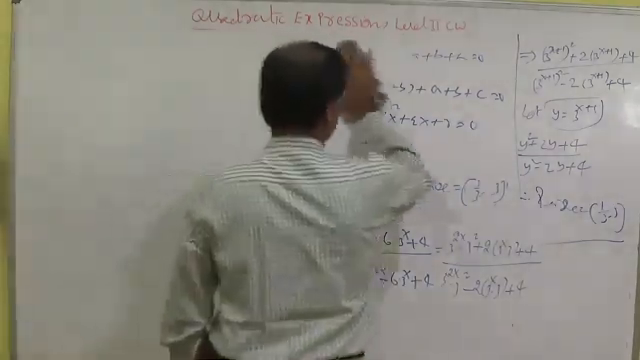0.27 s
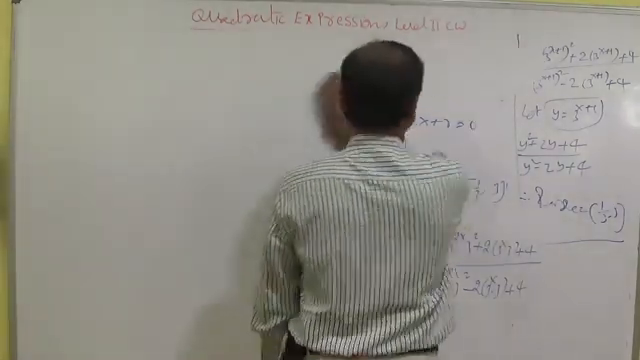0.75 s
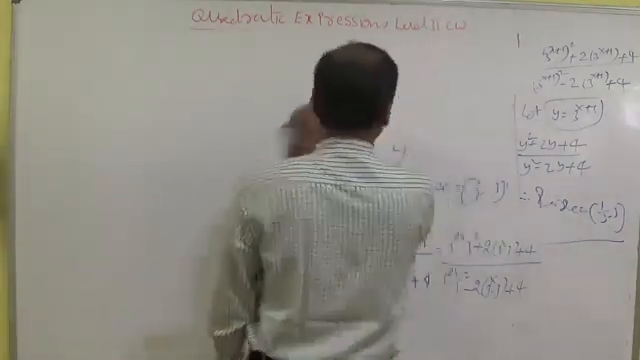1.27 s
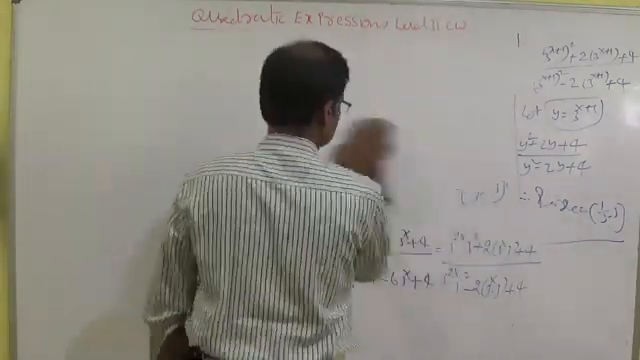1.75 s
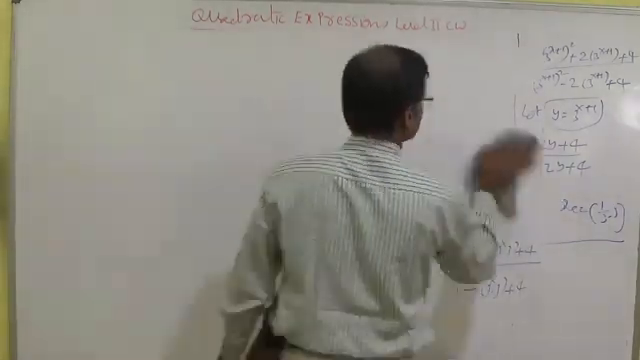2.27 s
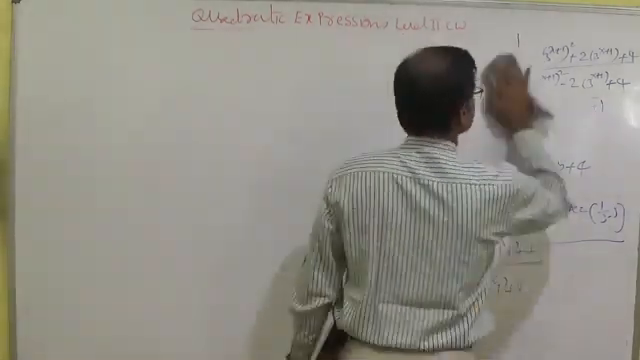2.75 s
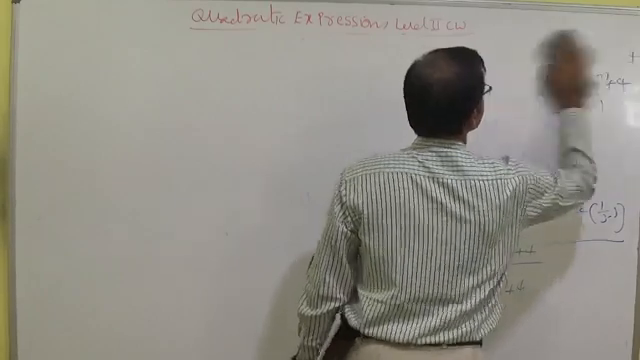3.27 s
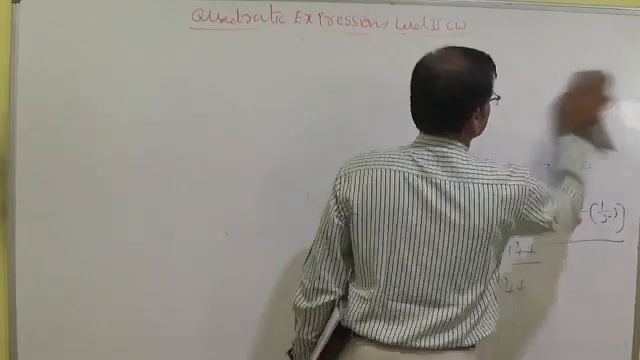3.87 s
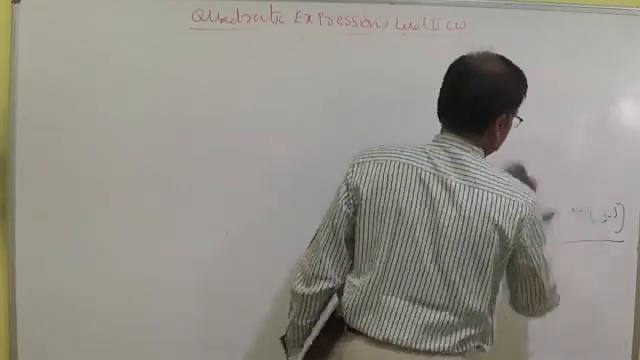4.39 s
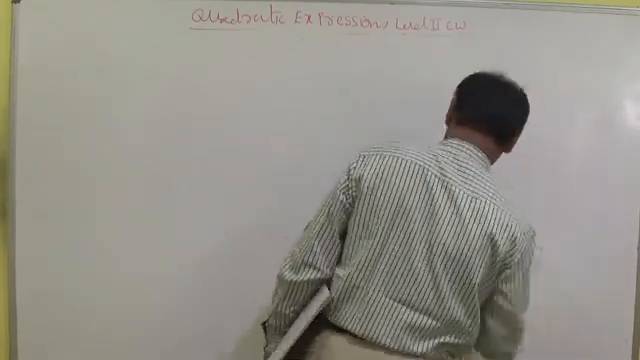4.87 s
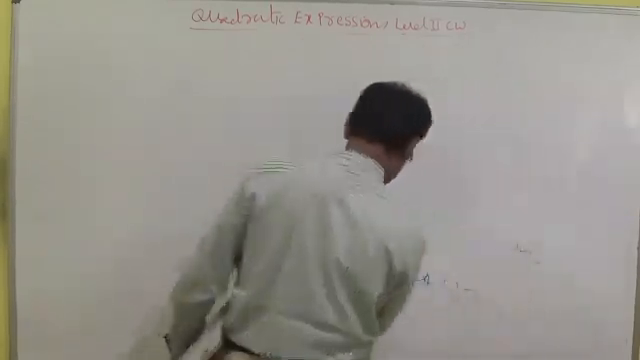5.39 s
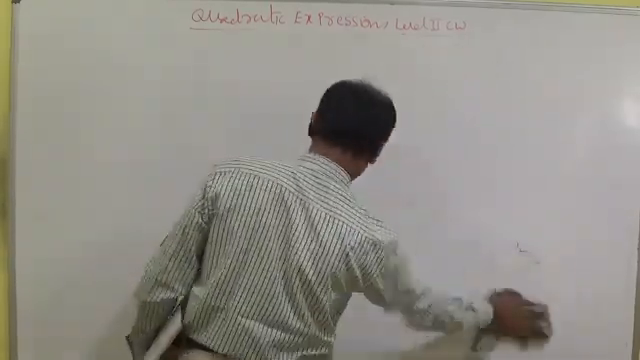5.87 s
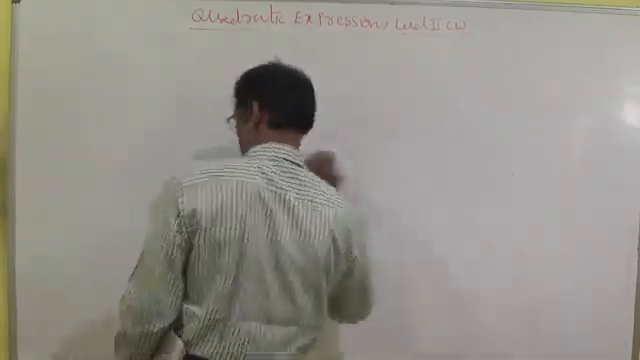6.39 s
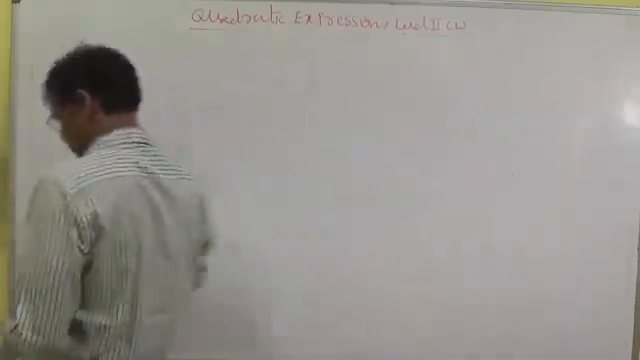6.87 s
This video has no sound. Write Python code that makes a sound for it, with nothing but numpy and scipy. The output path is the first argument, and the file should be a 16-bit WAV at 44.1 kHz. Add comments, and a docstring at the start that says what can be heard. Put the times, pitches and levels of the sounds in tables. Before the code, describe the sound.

A whiteboard is wiped with a felt duster in a bare, echoing classroom, over faint steady noise and light brushing. The duster's hard back clacks sharply right at the start. At about 0.5 seconds comes a loud, bright metallic double clink, with a tiny squeak just before and after. From 1 to 2.8 seconds the felt hisses in quick, uneven strokes. The loose board knocks against the wall with irregular hollow thumps until about 6.3 seconds, strongest near 0.9 and 1.4. Light clacks near 3.1 lead to a second loud double clink at 3.4. Until about 5.2 there are mostly knocks, soft brushing and a few faint chirps. Then the swishing strokes return and run to about 6.8, with brief high squeaks around 6 and 6.5. Another squeak and one short swipe come at about 7 seconds.

```python
"""A felt duster wipes a whiteboard in quick strokes, hissing by sliding friction.
Stick-slip makes it squeak. As the strokes turn, the loose panel knocks against the wall and booms
in its modes. The duster's hard back clacks, and twice something metal, probably the frame, gives
a loud double clink. The bare classroom reverberates over a faint, steady noise."""
import sys
import numpy as np
from scipy import signal
from scipy.fft import rfft, irfft, next_fast_len
from scipy.io import wavfile
from scipy.ndimage import uniform_filter1d, minimum_filter1d, map_coordinates

SR = 44100
rng = np.random.default_rng(int(sys.argv[2]) if len(sys.argv) > 2 else 0)


def to_wav(s):
    """Save 16-bit WAV."""
    ch = np.atleast_2d(s).T  # columns
    pcm = np.round(np.clip(ch, -1, 1) * 32767)  # PCM
    wavfile.write(sys.argv[1], SR, pcm.astype(np.int16))


N = 314857
TIME = np.arange(N) / SR
AGE = np.arange(SR // 5) / SR  # time since a contact
TOP_HZ = 11080  # upper band limit

# reverberation time of the late field: f/Hz, T60/s
REVERB_TIME = [(150, 0.79), (500, 1.0), (1200, 1), (3000, 1), (7000, 0.902), (11000, 0.74)]
# stereo width of the diffuse field: f/Hz, side relative to mid/dB
SIDE_GAIN = [(60, -13), (110, -20), (190, -13), (350, -12.5), (630, -9.5), (1120, -5.5), (2020, -5.5),
             (3630, -7), (6520, -7), (11700, -11.5)]
# steady room noise: f/Hz, level/dB
AIR_SPECTRUM = [(15, -54), (25, -24.5), (59, -14.5), (229, -7.5), (651, 0), (721, -4), (1080, -1.5),
                (1360, -5), (2160, -7), (2510, -1.5), (2850, -8), (5820, -12), (10200, -8), (11000, -13),
                (14300, -42), (22000, -120)]
# light brushing of the felt: f/Hz, level/dB
BRUSH_SPECTRUM = [(60, -23.5), (150, -2), (400, 6), (1500, 1.5), (5000, 0.5), (11000, -7.5)]
# envelope of that brushing: t/s, level/dB
BRUSH_ENVELOPE = [(0, 12.5), (.25, 7.5), (1.7, 5), (2.4, 3.5), (3.2, 2), (4.1, 0), (4.8, -9), (5.1, 1),
                  (7, -1.5)]
# the duster catching and slipping: t/s, level/dB, f/Hz, duration/s, roughness (0-1)
SQUEAK_EVENTS = [(0.321, -45.5, 1797, 0.012, 0.38), (0.739, -42, 4273, 0.0263, 0.45),
                 (3.993, -54.5, 2600, 0.0058, 0.38), (4.396, -58, 2650, 0.006, 0.42),
                 (4.8, -57, 2533, 0.0049, 0.45), (5.859, -40.5, 4426, 0.011, 0.34),
                 (6.059, -46.5, 4690, 0.016, 0.28), (6.466, -45, 1690, 0.0224, 0.44),
                 (7.024, -43, 3708, 0.013, 0.37), (7.029, -39.5, 2569, 0.0077, 0.02)]
# the panel striking the wall: t/s, level/dB, contact corner f/Hz
PANEL_KNOCKS = [(0.052, -45.5, 600), (0.384, -45.5, 850), (0.469, -54, 300), (0.499, -46, 1000),
                (0.757, -55, 160), (0.867, -38, 1010), (1.315, -55, 200), (1.386, -35, 1060),
                (1.929, -41, 840), (2.537, -45, 1000), (2.911, -44.5, 990), (3.067, -44.5, 1010),
                (3.159, -59, 170), (3.353, -43.5, 1100), (3.372, -44.5, 1100), (3.589, -55.5, 140),
                (3.757, -52.5, 806), (4.000, -56, 151), (4.162, -45, 1105), (4.562, -49.5, 1076),
                (4.645, -51.5, 970), (4.808, -58.5, 150), (4.915, -42, 980), (5.347, -49.5, 696),
                (5.465, -46, 403), (5.724, -50, 410), (6.304, -48.5, 702)]
# envelope of the panel's modes: f/Hz, level/dB
PANEL_SPECTRUM = [(120, -17.5), (170, -7.5), (270, -2), (400, -0.5), (650, 0.5), (950, -1), (1300, -8.5),
                  (2000, -9)]
# contact of panel and wall: f/Hz, level/dB
TICK_SPECTRUM = [(100, -44), (300, 12.5), (1200, 4.5), (2500, 5.5), (5000, 3.5), (7000, 2), (10500, 4)]
# impacts of the duster's back: t/s, level/dB, contact corner f/Hz
SHELL_IMPACTS = [(0.0516, -24, 10000), (0.0549, -31, 18000), (0.805, -41, 8000), (3.0681, -41.5, 5650),
                 (3.098, -46, 5840), (6.59, -50.5, 15000)]
# modes of the duster's back: f/Hz, bandwidth/Hz, level/dB
SHELL_MODES = [(1420, 1100, -6), (3210, 484, 2), (5450, 780, 8), (6060, 820, 3), (7840, 340, -12),
               (9140, 480, 0), (11500, 250, 11.5)]
# contact of the duster's back: f/Hz, level/dB
SNAP_SPECTRUM = [(100, -25), (400, -17), (1500, -6), (3000, -2), (5500, 2.5), (11000, 9)]
# blows on the metal: t/s, level/dB, place between two spots (0-1)
METAL_BLOWS = [(0.498, -17.5, 0), (0.526, -27, 0.3), (3.359, -17.5, 0.97), (3.395, -24.5, 0.8)]
# modes of the metal: f/Hz, bandwidth/Hz, level at the first spot/dB, level at the second/dB
METAL_MODES = [(2238, 39, -24, -16.5), (2478, 37, -7.5, -18), (2800, 250, -6, -47.5), (3890, 570, 1, -44),
               (3996, 63, -11, -12.5), (4810, 150, -11, -15.5), (5500, 150, -10, -10), (6310, 46, -2.5, -8),
               (6528, 69, -2, -3.5), (6520, 42, 0, -7), (6870, 31, -7.5, -14.5), (7600, 45, -5, -30.5),
               (7240, 146, -5, -28), (8080, 54, -6, -2.5), (8480, 25, -11.5, -6), (8366, 18.8, -27.5, -1.5),
               (8910, 36, -4, -26), (9130, 88, 2, -32.5), (9560, 30, 0, -29.5), (9976, 194, -3, -8.5),
               (10320, 77, -5, -13), (10510, 33.8, -5, 7.5), (10770, 82, -3, -2)]
# contact with the metal: f/Hz, level/dB
STRIKE_SPECTRUM = [(100, -50.5), (500, -7), (2000, -8), (5000, -7.5), (7000, 6.5), (11000, -4.5)]
# strokes of the felt: t/s, duration/s, level/dB, added scrape gain/dB
FELT_STROKES = [(0.317, 0.061, -38.5, -8.5), (0.377, 0.0416, -48, -8.5), (1.056, 0.23, -34.5, -8),
                (1.276, 0.075, -58, 9), (1.579, 0.28, -50.5, -7.5), (1.873, .135, -43, -5.5),
                (2.045, 0.11, -36.5, -15.5), (2.127, 0.135, -63.5, 8), (2.634, 0.15, -39, -20),
                (5.271, 0.16, -40.5, -5), (5.448, 0.34, -48.5, -4.5), (5.698, 0.23, -40, -7.5),
                (6.084, 0.26, -39.5, -4.5), (6.221, 0.38, -44, -11), (6.465, 0.0575, -39, -4.5),
                (6.744, 0.077, -54, -2), (7.099, .048, -36, -17)]
# fine hiss of the fibres: f/Hz, level/dB
HISS_SPECTRUM = [(1500, -25), (3500, -10.5), (6000, -7.5), (8000, -1), (10500, -1)]
# coarse scrape of the felt: f/Hz, level/dB
SCRAPE_SPECTRUM = [(150, -20), (400, -15), (1000, -10.5), (2000, -2), (3500, -1.5), (5500, -2), (9000, -7)]


def amp(db):
    """Amplitude ratio of a level: 20 dB to a factor of ten."""
    return 10 ** (np.asarray(db) / 20)


def unit(x):
    """Power normalisation to rms 1."""
    return x / np.sqrt(np.mean(x ** 2) + 1e-20)


def burst(x):
    """Energy normalisation to that of 10 ms at rms 1."""
    return x * np.sqrt(SR / 100 / (np.sum(x ** 2) + 1e-20))


def along(points, hz):
    """Interpolation of (f/Hz, value) points on a logarithmic frequency axis."""
    f, values = np.transpose(points)
    return np.interp(np.log(hz + 1), np.log(f), values)


def filtered(x, response):
    """Linear filtering: the spectrum is multiplied by a frequency response."""
    n = x.shape[-1]
    padded = next_fast_len(n + SR // 4)
    return irfft(rfft(x, padded) * response(np.fft.rfftfreq(padded, 1 / SR)), padded)[..., :n]


def coloured(x, spectrum):
    """Spectral shaping by (f/Hz, level/dB) points."""
    return filtered(x, lambda hz: amp(along(spectrum, hz)))


def wobble(rate, size=N):
    """Smooth random modulation: a spline through `rate` Gaussian knots a second."""
    knots = rng.standard_normal(int(size * rate / SR) + 4)
    return map_coordinates(knots, [np.arange(size) * rate / SR])


def ring(hz, width, db, swell_cycles):
    """Modal superposition: each mode builds up over its own cycles and decays as its bandwidth sets."""
    hz, width, db = (np.asarray(v)[:, None] for v in (hz, width, db))
    waves = np.sin(2 * np.pi * (hz * AGE + rng.random(hz.shape)))
    envelope = np.exp(-np.pi * width * AGE) * (1 - np.exp(-hz * AGE / swell_cycles))
    return burst(np.sum(amp(db) * np.sqrt(width) * envelope * waves, axis=0))


def contact_db(hz, corner_hz):
    """A contact of finite duration acts as a low-pass filter on the excitation."""
    return -10 * np.log10(1 + (hz / corner_hz) ** 4)


def click(response_db, smear_s):
    """Dispersion: bending waves spread a hard contact over a time of the order of smear_s."""
    hz = np.fft.rfftfreq(len(AGE), 1 / SR)
    group_delay = smear_s * (.3 + np.interp(hz, np.linspace(0, TOP_HZ, 40), rng.random(40)))
    phase = 2 * np.pi * np.cumsum(group_delay) * hz[1]
    magnitude = amp(response_db(hz)) / (1 + (hz / TOP_HZ) ** 30)
    wave = irfft(magnitude * np.exp(-1j * phase), len(AGE))
    return burst(wave * (AGE < AGE[-1] / 2))


def room(early_db, late_db, early_t60=0.26):
    """Impulse response: direct sound, then early and late reflections that decay exponentially."""
    n = 3 * SR // 4
    hz, t, noise = signal.stft(rng.standard_normal((2, n)), SR, nperseg=256)
    early = 10 ** (-3 * t / early_t60)
    late = 10 ** (-3 * t / along(REVERB_TIME, hz)[:, None])
    decay = np.hypot(amp(early_db) * unit(early), amp(late_db) * unit(late)) / np.sqrt(n)
    noise[1] *= amp(along(SIDE_GAIN, hz))[:, None]
    mid, side = signal.istft(noise * decay, SR, nperseg=256)[1]
    mid[0] += 1  # direct sound
    return np.array([mid + side, mid - side])


def add(out, onset, sound, response):
    """Convolution with a room response places a sound in the mix at onset seconds."""
    start = round(onset * SR)
    heard = signal.fftconvolve(sound[None], response, axes=1)[:, :N - start]
    out[:, start:start + heard.shape[1]] += heard


def diffuse_noise(spectrum):
    """A diffuse field is partly coherent at two points: mid and side are independent noises."""
    mid, side = coloured(rng.standard_normal((2, N)), spectrum)
    side = coloured(side, SIDE_GAIN)
    return unit(np.array([mid + side, mid - side]))


def background(air_db=-60, brush_db=-62, drift_db=2):
    """Two diffuse fields add: steady room noise and the faint friction of lightly brushing felt."""
    air = diffuse_noise(AIR_SPECTRUM)
    brush = diffuse_noise(BRUSH_SPECTRUM)
    effort_db = np.interp(TIME, *np.transpose(BRUSH_ENVELOPE)) + drift_db * wobble(7.4)
    return amp(air_db) * air + amp(brush_db + effort_db) * brush


def squeaks(overtone_db=-27, sag=0.048):
    """Stick-slip oscillation: the pitch sags as the grip eases, and roughness scatters the period."""
    out = np.zeros((2, N))
    for onset, level_db, pitch_hz, duration, roughness in SQUEAK_EVENTS:
        progress = np.minimum(AGE / duration, 1)
        pitch = pitch_hz * (1 + sag * (.5 - progress) + roughness * wobble(5000, len(AGE)))
        phase = 2 * np.pi * np.cumsum(pitch) / SR
        swell = np.sqrt(np.abs(np.sin(np.pi * progress)))
        chirp = swell * (np.sin(phase) + amp(overtone_db) * np.sin(2 * phase))
        add(out, onset, amp(level_db) * burst(chirp), room(early_db=-4, late_db=-2))
    return out


def panel_knocks(width_hz=22, bounce_s=.0022, bounce_db=-2):
    """Plate vibration: the panel ticks twice on the wall and booms, its low modes swelling last."""
    out = np.zeros((2, N))
    grid = np.linspace(PANEL_SPECTRUM[0][0], PANEL_SPECTRUM[-1][0], 56)
    for onset, level_db, corner_hz in PANEL_KNOCKS:
        hz = grid + (grid[1] - grid[0]) * (rng.random(len(grid)) - .5)
        mode_db = along(PANEL_SPECTRUM, hz) + contact_db(hz, corner_hz)
        boom = ring(hz, np.full(len(hz), width_hz), mode_db, swell_cycles=3.4)
        add(out, onset, amp(level_db) * boom, room(early_db=-5.5, late_db=0))
        first, second = (click(lambda f: along(TICK_SPECTRUM, f), smear_s=.002) for _ in range(2))
        ticks = first + amp(bounce_db) * np.roll(second, round(bounce_s * SR))
        tick_db = level_db - 5 + 3 * np.log2(corner_hz / 1000)  # a softer, duller push ticks less
        add(out, onset, amp(tick_db) * ticks, room(early_db=1, late_db=-1))
    return out


def duster_clacks(snap_db=-1):
    """Heavy damping: struck, the duster's hollow back rings for only a few milliseconds."""
    out = np.zeros((2, N))
    hz, width, mode_db = np.transpose(SHELL_MODES)
    for onset, level_db, corner_hz in SHELL_IMPACTS:
        shell = ring(hz, width, mode_db + contact_db(hz, corner_hz), swell_cycles=0.81)
        snap = click(lambda f: along(SNAP_SPECTRUM, f) + contact_db(f, corner_hz), smear_s=0.001446)
        add(out, onset, amp(level_db) * shell, room(early_db=-4, late_db=-3))
        add(out, onset, amp(level_db + snap_db) * snap, room(early_db=1, late_db=-4))
    return out


def metal_clinks(strike_db=-9):
    """Modal excitation: the place of the blow decides how strongly each mode of the metal rings."""
    out = np.zeros((2, N))
    hz, width, first_db, second_db = np.transpose(METAL_MODES)
    for onset, level_db, place in METAL_BLOWS:
        modes = ring(hz, width, first_db + place * (second_db - first_db), swell_cycles=1)
        strike = click(lambda f: along(STRIKE_SPECTRUM, f), smear_s=0.000982)
        add(out, onset, amp(level_db) * modes, room(early_db=1, late_db=-0.5))
        add(out, onset, amp(level_db + strike_db) * strike, room(early_db=-1, late_db=1))
    return out


def hand_speed(progress, fastest_at=0.41):
    """Stroke kinematics: a skewed half sine, rising from rest and slowing more gently into the turn."""
    skew = np.log(.5) / np.log(fastest_at)
    return np.abs(np.sin(np.pi * np.clip(progress, 0, 1) ** skew))


def fibre_noise(spectrum, size, grain_db=2.5):
    """Incoherent summation: countless slipping fibres add up to a grainy noise."""
    slips = rng.standard_normal(size) * amp(grain_db * wobble(1500, size))
    return unit(coloured(slips, spectrum))


def wiping(speed_exponent=1.33, judder_db=1, hiss_db=-2, scrape_db=-3):
    """Sliding friction: felt noise grows as a power of speed; pressing harder adds a coarse scrape."""
    out = np.zeros((2, N))
    t = TIME[:SR // 2]  # time since a stroke began
    for onset, duration, level_db, coarse_db in FELT_STROKES:
        juddering_db = level_db + judder_db * wobble(69.5, len(t))
        strength = hand_speed(t / duration) ** speed_exponent * amp(juddering_db)
        hiss = amp(hiss_db) * fibre_noise(HISS_SPECTRUM, len(t))
        scrape = amp(scrape_db + coarse_db) * fibre_noise(SCRAPE_SPECTRUM, len(t))
        add(out, onset, strength * (hiss + scrape), room(early_db=-2, late_db=-8))
    return out


def scene():
    """Superposition: the sounds at the board and the background add in the middle of the room."""
    return wiping() + panel_knocks() + duster_clacks() + metal_clinks() + squeaks() + background()


def record(dry, ceiling_db=-10, low_cut_hz=80):
    """Band and peak limiting: a bass cut, a fast limiter on the loudest peaks, then a steep low-pass."""
    thin = signal.sosfilt(signal.butter(2, low_cut_hz, "highpass", fs=SR, output="sos"), dry)
    needed_gain = np.minimum(1, amp(ceiling_db) / (np.abs(thin).max(axis=0) + 1e-9))
    gain = uniform_filter1d(minimum_filter1d(needed_gain, size=60), size=30)
    return filtered(thin * gain, lambda hz: 1 / (1 + (hz / TOP_HZ) ** 200))


dry = scene()
out = record(dry)
to_wav(out)
```